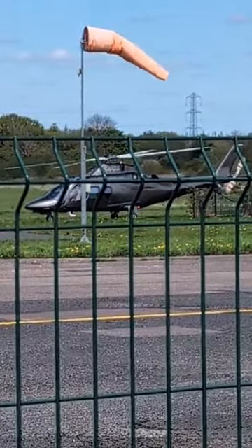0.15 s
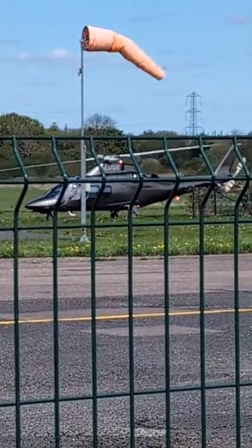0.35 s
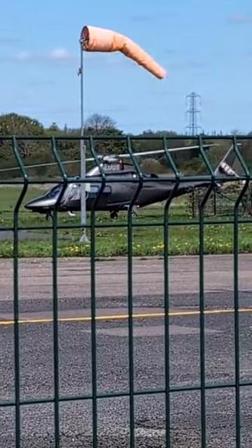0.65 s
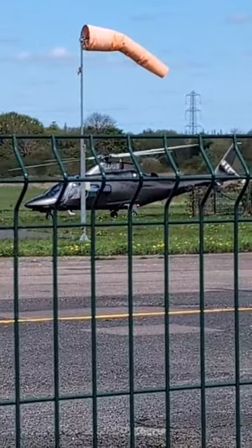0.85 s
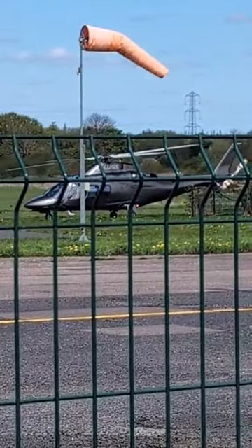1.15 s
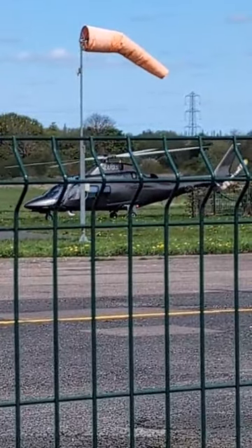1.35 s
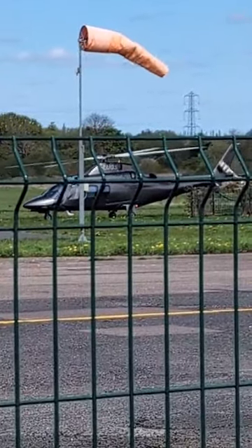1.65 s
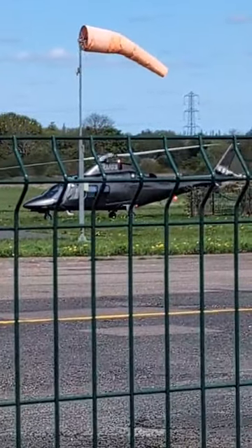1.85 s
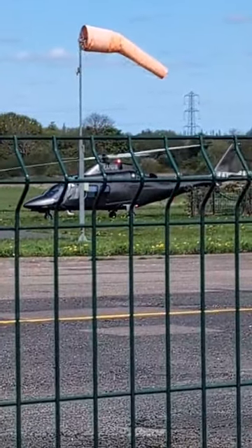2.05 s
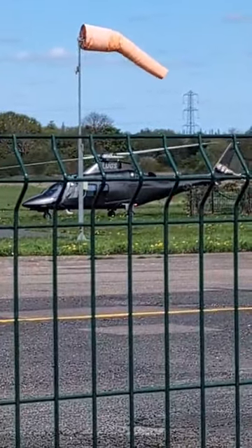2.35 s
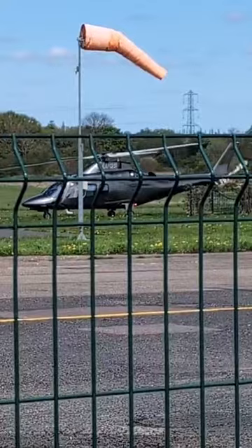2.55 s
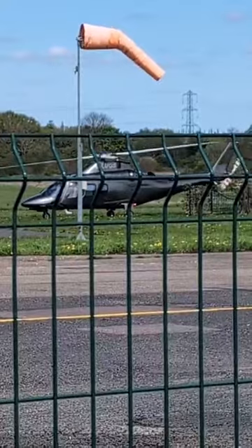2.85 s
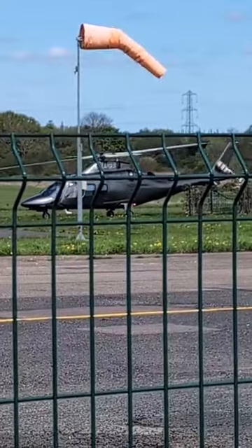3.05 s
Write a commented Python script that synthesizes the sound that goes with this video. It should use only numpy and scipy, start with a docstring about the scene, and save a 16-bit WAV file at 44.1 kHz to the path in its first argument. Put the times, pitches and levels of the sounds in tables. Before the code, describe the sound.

A parked helicopter's low blade throb and hissing exhaust roar, under heavy wind rumble that soon eases

```python
"""Windy grass, some tens of metres from an idling helicopter, heard on a phone with two microphone ports.
Blade thumps are wavering harmonics; the exhaust roar is banded noise that comes and goes in the moving air.
Narrow noise bands are the turbine hisses, sines are the gear tones and a turbine whine running down.
Gusts rumble as low noise and buffet the ports separately as short swings of pressure with raspy noise;
a burst of rough air noise crackles over a gust."""
import sys
import numpy as np
from scipy import signal
from scipy.fft import rfft, irfft
from scipy.io import wavfile
from scipy.ndimage import uniform_filter1d

SR = 44100
rng = np.random.default_rng(int(sys.argv[2]) if len(sys.argv) > 2 else 0)


def wrap_up_sound(samples):
    """Save the sound to the file named by the first command line argument, as 16-bit audio."""
    columns = np.atleast_2d(samples).T
    # keep every value between -1 and 1, then stretch to whole-number steps
    tamed = np.clip(columns, -1, 1)
    steps = np.round(tamed * 32767).astype(np.int16)
    wavfile.write(sys.argv[1], SR, steps)


N = 141120
T = np.arange(N) / SR
HZ = np.fft.rfftfreq(N, 1 / SR)
PORT_SIGN = np.array([[1], [-1]])  # a side signal is opposite on the left and right ports


def undb(db):
    """Decibels to an amplitude factor."""
    return 10 ** (np.asarray(db) / 20)


def unit(x):
    """Scale to an rms of 1."""
    return x / np.sqrt(np.mean(x ** 2))


def curve(table, order):
    """One column of a table over time."""
    return np.interp(T, np.array(table)[:, 0], np.array(table)[:, order])


def over_hz(table, hz):
    """A table read on a log-frequency axis."""
    return np.interp(np.log(hz + 1), np.log(np.array(table)[:, 0]), np.array(table)[:, 1])


def walk(rate):
    """Random levels held for 1 / rate s and smoothed twice, with a spread of about 1."""
    hold = int(SR / rate)
    steps = np.repeat(rng.standard_normal(N // hold + 1), hold)
    smooth = uniform_filter1d(uniform_filter1d(steps, hold), hold)
    return 1.37 * smooth[:N]


def shaped(gain):
    """Noise with a given gain per frequency."""
    return irfft(rfft(rng.standard_normal(N)) * gain, N)


def hump(lo_hz, hi_hz, rise, fall):
    """Band shape with a slope of its own on each flank."""
    low_flank = 1 + (lo_hz / (HZ + 1)) ** (2 * rise)
    high_flank = 1 + (HZ / hi_hz) ** (2 * fall)
    return 1 / np.sqrt(low_flank * high_flank)


def wide_noise(shape, side_gain):
    """Noise shared by both ports plus separate noise of opposite sign on each."""
    return unit(shaped(shape)) + side_gain * unit(shaped(shape)) * PORT_SIGN


WIND_LIKE = 0.25  # share of the rumble's power common to both ports
WIND_TRIM_DB, WIND_FLICKER_DB, PORT_FLICKER_DB = -4.0, 1.5, 1.4
WIND_CALM_DB, WIND_CALM_SPAN_DB = -35.5, 4.2  # silent at the calm level, in full one span above it
# wind rumble on the ports: time_s, level_db (before the trim), lowest_part_db (added for the lower band)
WIND_RUMBLE = [(0.0, -23, 7), (0.11, -10, -4), (0.15, -11, -11), (0.2, -20.5, -2.5), (0.43, -20, 2.5),
               (0.49, -14, 0), (0.55, -22.5, -0.5), (0.64, -34, 7.5), (0.7, -17, 1), (0.75, -23, 8.5),
               (0.8, -25.5, -1.5), (0.87, -13.5, -4), (0.92, -27.5, 2.5), (1.0, -24, 11),
               (1.03, -29.5, -16), (1.12, -9.5, -7), (1.16, -30.5, 12), (1.18, -20, 0.5),
               (1.33, -15.5, -2.5), (1.45, -19.5, -3), (1.57, -16.5, -16), (1.67, -35.5, 3.5),
               (1.94, -31, -4), (2.02, -40.5, 5), (2.18, -34, 3), (2.66, -37.5, -1), (2.69, -26.5, 0),
               (2.72, -30.5, 3), (3.02, -36.5, 10), (3.17, -19, 5.5), (3.2, -15, -5)]


def wind():
    """Moving air on the ports: rumble in two bands, nearly unrelated left and right, churning quickly."""
    out, main, churn = 0, curve(WIND_RUMBLE, order=1), walk(34.56)
    bands = [(hump(107.5, 285, 9.5, 5.2), main),
             (hump(63, 123, 4.0, 3.98), main + curve(WIND_RUMBLE, order=2))]
    calm_gate = np.clip((main - WIND_CALM_DB) / WIND_CALM_SPAN_DB, 0, 1)
    for shape, level_db in bands:
        both = np.sqrt(WIND_LIKE) * unit(shaped(shape))
        ports = np.array([both + np.sqrt(1 - WIND_LIKE) * unit(shaped(shape)) for _ in range(2)])
        port_churn = np.array([walk(39.25), walk(40.26)])
        flicker_db = WIND_FLICKER_DB * churn + PORT_FLICKER_DB * port_churn
        out = out + ports * calm_gate * undb(level_db + WIND_TRIM_DB + flicker_db)
    return out


BLADE_HZ, BLADE_AT_S = 22.56, 2.213  # thump rate and a moment when its phase is zero
BLADE_DB, BLADE_SCATTER_DB = -32.5, 1  # rms of all harmonics together; waver of each one


def blade_phase():
    """Phase of the blade beat in radians, turning at a steady rate."""
    return 2 * np.pi * BLADE_HZ * (T - BLADE_AT_S)


# blade thump harmonics: multiple (of BLADE_HZ), level_db (against each other)
BLADE_HARMONICS = [(2, -33), (3, 1.5), (4, -1), (5, -12.5), (6, -6.5), (7, -8), (8, -4.5), (9, -7),
                   (10, -8), (11, -12.5), (12, -14), (13, -12.5), (14, -16)]


def blades():
    """A low thump per blade; every harmonic wavers on its own, a little differently at each port."""
    out = 0
    for multiple, db in BLADE_HARMONICS:
        amplitude = undb(db + BLADE_SCATTER_DB * walk(7.8))
        waver_rad = 1.2 * walk(9) + 0.51 * np.array([walk(9), walk(9)])
        out = out + amplitude * np.cos(multiple * blade_phase() + waver_rad)
    return undb(BLADE_DB) * unit(out)


# parts of the roar swell or dip for a moment: time_s, half_length_s, pitch_hz, half_width_octaves, level_db
ROAR_SWELLS = [(0.016, 0.034, 3270, 0.18, 7), (0.28, 0.083, 4500, 0.4, 2.5), (0.393, 0.026, 9070, 0.17, 5),
               (0.57, 0.09, 3300, 0.49, 5), (0.598, 0.19, 1570, 0.35, -3), (0.924, 0.14, 3470, 0.14, 7.5),
               (0.894, 0.028, 9400, 0.091, 5.5), (1.097, 0.28, 5110, 0.1, 7.5),
               (1.523, 0.11, 3240, 0.32, 4), (1.657, 0.17, 1385, 0.2, 8), (1.964, 0.055, 1930, 0.15, 10),
               (2.112, 0.067, 1930, 0.17, 7.5), (2.12, 0.12, 2850, 0.087, -11.5),
               (2.08, 0.078, 1480, .12, -6), (2.19, 0.028, 4940, 0.068, 8.5), (2.38, 0.15, 1480, 0.42, 4),
               (2.602, 0.18, 3950, 0.17, -1.5), (2.87, 0.065, 1420, 0.19, 4.5),
               (3.004, 0.056, 8000, 0.48, 3.5), (3.122, 0.044, 3800, 0.16, 6.5),
               (3.168, 0.13, 1500, 0.55, 7)]


def swell_db(hz):
    """Level change over time at one frequency, from bumps in time and log frequency."""
    s, half_s, at_hz, half_oct, db = np.array(ROAR_SWELLS).T
    near_db = db * np.exp(-(np.log2(hz / at_hz) / half_oct) ** 2 / 2)
    coarse_s = T[::256]
    bumps = np.exp(-((coarse_s - s[:, None]) / half_s[:, None]) ** 2 / 2)
    return np.interp(T, coarse_s, near_db @ bumps)


ROAR_DB, ROAR_THROB_DB = -36.5, 0.3
ROAR_FLICKER_DB, FLICKER_DB_PER_OCT = 1.5, 0.62  # flicker, and its growth above 1500 Hz
# exhaust and rotor roar: pitch_hz, level_db (per Hz, against each other)
ROAR_COLOUR = [(24, -38), (40, -15), (51, -11.5), (79, -1.5), (113, -25.5), (134, -19), (228, -15.5),
               (319, -12), (378, -18), (406, -18), (437, -24), (628, -20.5), (970, -25.5), (1430, -22.5),
               (1860, -27.5), (2740, -29.5), (4660, -32), (7930, -42), (12800, -69), (16700, -100)]
# width of the roar: pitch_hz, side_minus_mid_db
ROAR_WIDTH = [(60, -5), (200, -14), (350, -19.5), (640, -12), (1160, -14), (2100, -10), (3790, -8.5),
              (6860, -6.5), (12400, 4.5)]
# the roar as the air carries it, also used by the hisses: time_s, level_db (less of it below 900 Hz here)
AIR_CARRY = [(0, 1), (.4, 0), (.8, 0), (1.2, 2), (1.6, 0.5), (2.0, 0), (2.4, -0.2), (2.8, 0), (2.95, 1.5),
             (3.2, 2)]


def roar():
    """Exhaust noise in bands a fifth of an octave apart that swell, flicker and throb with the blades."""
    out, colour, throb = 0, undb(over_hz(ROAR_COLOUR, HZ)), np.cos(blade_phase())
    place = np.log2(HZ + 1) * 5
    for band in range(27, 70):
        hz = 2 ** (band / 5)
        shape = colour * np.cos(np.pi / 2 * np.clip(place - band, -1, 1))
        carry_db = curve(AIR_CARRY, order=1) * min(hz / 900, 1)
        depth_db = ROAR_FLICKER_DB + FLICKER_DB_PER_OCT * max(np.log2(hz / 1500), 0)
        flicker_db = depth_db * walk(rng.uniform(10.5, 29.86))
        level_db = swell_db(hz) + carry_db + ROAR_THROB_DB * throb + flicker_db
        side = undb(over_hz(ROAR_WIDTH, hz)) * shaped(shape)
        out = out + undb(level_db) * (shaped(shape) + side * PORT_SIGN)
    return undb(ROAR_DB) * unit(out)


HISS_SAG_S, HISS_FLICKER_DB = 1.5, 1.5
HISS_SWELL_TIMES = 2.1  # the hisses follow the roar's swells this many times as deeply, in dB
# narrow hisses of the turbine: pitch_hz, width_hz, level_db, sag_db_per_s (from HISS_SAG_S on)
TURBINE_HISSES = [(3400, 320, -60, 4.5), (4340, 170, -61, 10), (8200, 1400, -60.5, 1.5),
                  (9290, 170, -65, 4.5), (10030, 2000, -68.5, 1.7)]


def hisses():
    """Turbine noise in narrow bands that swell more deeply than the roar around them."""
    out = 0
    for hz, width_hz, db, sag_db in TURBINE_HISSES:
        shape = np.exp(-((HZ - hz) / width_hz) ** 2 * 2)
        steady_db = db - sag_db * np.clip(T - HISS_SAG_S, 0, 9) + curve(AIR_CARRY, order=1)
        moving_db = HISS_SWELL_TIMES * swell_db(hz) + HISS_FLICKER_DB * walk(11.4)
        out = out + undb(steady_db + moving_db) * wide_noise(shape, 0.5)
    return out


TONE_WAVER_DB, TONE_WANDER = 1.5, 0.002  # level waver, and pitch wander as a fraction
GEARS_SLOW_S, GEARS_SLOW_PER_S2 = 1.75, 0.055  # the gears slow ever faster once the turbine is shut down
# gearbox tones: pitch_hz (before slowing), level_db (against their common level)
GEAR_TONES = [(1081.5, 0), (2794, -15)]
# common level of the gear tones: time_s, level_db (rms)
GEAR_LEVEL = [(0, -51), (.27, -48), (.42, -55), (.75, -53.5), (.9, -56.5), (1.18, -55), (1.3, -50),
              (1.42, -55), (1.55, -49), (1.8, -59), (2.3, -57), (3.2, -66)]


def gear_tones():
    """Gear meshing as sines that waver in level and pitch, and sag as the gears slow."""
    out = 0
    for hz, db in GEAR_TONES:
        slowing = GEARS_SLOW_PER_S2 * np.clip(T - GEARS_SLOW_S, 0, 9) ** 2
        pitch_hz = hz * (1 - slowing + TONE_WANDER * walk(12.78))
        level_db = db + curve(GEAR_LEVEL, order=1) + TONE_WAVER_DB * walk(7.92)
        out = out + undb(level_db) * np.sin(2 * np.pi * np.cumsum(pitch_hz) / SR)
    return np.sqrt(2) * out  # sine peak from rms


BUFFET_CYCLES, BUFFET_SCATTER_RAD = 0.61, 1  # envelope half width; phase scatter of each port
BUFFET_EDGE_DB = -11.5  # second harmonic against the swing
RASP_S, RASP_SIDE_DB = 0.0047, -8.5  # half length; side against mid
# single buffets, centred 4 ms after time_s:
# time_s, swing_db, pitch_hz, left_minus_right_db, rasp_db, bright_rasp_db
WIND_BUFFETS = [(0.092, -10.5, 152, 9, -37, -43), (0.11, -7.5, 180, -11, -29, -42),
                (0.122, -9.5, 176, 6, -28, -30), (0.137, -4, 181, 3, -22, -31),
                (0.144, -17, 196, 5, -22.5, -34), (0.182, -20, 183, 13, -29.5, -36),
                (0.266, -12.5, 118, 1, -48, -53), (0.389, -10.5, 133, 0.5, -33, -62),
                (0.468, -13, 201, 9, -49, -45), (0.493, -6, 140, 3.5, -40, -41),
                (0.691, -15.5, 151, 1, -41, -60), (0.867, -17, 188, -7, -44, -55),
                (0.885, -3, 185, 0.5, -35, -51), (0.972, -13.5, 210, 0, -37, -57),
                (0.998, -22, 114, 4, -55, -45), (1.073, -16.5, 138, -5, -29.5, -49),
                (1.114, -7.5, 156, -1, -46, -22), (1.129, -6, 175, 3, -18.5, -39),
                (1.183, -7, 114, -1, -40, -45), (1.217, -15, 107, -11, -52, -45),
                (1.253, -8.5, 157, -3, -37, -58), (1.302, -8, 220, 2, -23, -39),
                (1.341, -2, 178.6, -1.5, -23, -40), (1.391, -17, 154, -2, -52, -53),
                (1.455, -17.5, 143, 7, -47, -37.5), (1.504, -10.5, 130, 0, -44, -43),
                (1.574, -15, 191, -4, -35, -59), (1.589, -20, 140, 4, -46, -51),
                (1.718, -18.5, 107, -1, -58, -50), (1.877, -19.5, 141, 3, -49, -62),
                (2.208, -18.5, 81, 3, -47, -51), (2.699, -19, 162, -1, -39, -45),
                (3.085, -18, 199, 1, -31.5, -44), (3.136, -16.5, 227, 2, -44, -45),
                (3.171, -11, 192, 4, -49, -48)]
# the rasp and the bright rasp: low_hz, high_hz
RASP_EDGES = [(280, 470), (480, 680)]


def buffets():
    """Each buffet is a swing or two of pressure, out of step between the ports, with a short rasp on top."""
    out, gate = np.zeros((2, N)), np.zeros((2, N))
    chance = rng.standard_normal((len(WIND_BUFFETS), 3))
    for (s, db, hz, pan_db, *rasp_db), luck in zip(WIND_BUFFETS, chance):
        i = np.arange(max(int((s - .04) * SR), 0), min(int((s + .05) * SR), N))
        since_s = T[i] - s - .004
        cycles = since_s * hz
        gate[:, i] += undb(rasp_db)[:, None] * np.exp(-(since_s / RASP_S) ** 2 / 2)
        envelope = np.exp(-(cycles / BUFFET_CYCLES) ** 2 / 2)
        for port, sign in enumerate((1, -1)):
            phase = 2 * np.pi * cycles + np.pi * luck[0] + BUFFET_SCATTER_RAD * luck[1 + port]
            swing = np.cos(phase) + undb(BUFFET_EDGE_DB) * np.cos(2 * phase)
            out[port, i] += undb(db + sign * pan_db / 2) * envelope * swing
    for rasp_gate, (lo_hz, hi_hz) in zip(gate, RASP_EDGES):
        out = out + rasp_gate * wide_noise(hump(lo_hz, hi_hz, 4, 6), undb(RASP_SIDE_DB))
    return out


CRACKLE_S, CRACKLE_HALF_S, CRACKLE_DB = 0.1325, 0.014, -34
CRACKLE_LO_HZ, CRACKLE_HI_HZ = 745, 1400


def crackle():
    """A rough burst of air noise over the first gust, its level roughened by a fast random flicker."""
    envelope = np.exp(-((T - CRACKLE_S) / CRACKLE_HALF_S) ** 2 / 2)
    puff = envelope * undb(CRACKLE_DB + 3 * walk(149))
    return puff * wide_noise(hump(CRACKLE_LO_HZ, CRACKLE_HI_HZ, 4.7, 6.9), undb(RASP_SIDE_DB))


# the whine runs down from WHINE_HZ at WHINE_S toward WHINE_END_HZ
WHINE_S, WHINE_HZ, WHINE_END_HZ, WHINE_FALL_S = 2.0, 15430, 8000, 1.883
WHINE_WAVER_DB = 3.5
# level of the whine: time_s, level_db (rms)
WHINE_LEVEL = [(1.9, -110), (2.0, -96), (2.24, -89), (2.5, -84), (2.82, -76), (2.9, -93), (2.96, -65),
               (3.02, -76), (3.1, -60.5), (3.2, -69)]


def whine():
    """The turbine running down: a sine whose pitch decays exponentially, wavering apart on the two ports."""
    fall = np.exp(-np.clip(T - WHINE_S, -.2, 9) / WHINE_FALL_S)
    pitch_hz = WHINE_END_HZ + (WHINE_HZ - WHINE_END_HZ) * fall
    waver = walk(25.5) + 0.38 * np.array([walk(14), walk(9.1)])
    amplitude = np.sqrt(2) * undb(curve(WHINE_LEVEL, order=1) + WHINE_WAVER_DB * waver)
    return amplitude * np.sin(2 * np.pi * np.cumsum(pitch_hz) / SR)


def scene():
    """Everything that reaches the two ports."""
    helicopter = blades() + roar() + hisses() + gear_tones() + whine()
    return wind() + helicopter + buffets() + crackle()


TOP_HZ = 15000


def record(dry):
    """The phone cuts the deep bass, rounds the loudest peaks and cuts the top."""
    bass_cut = signal.butter(3, 45, "high", fs=SR, output="sos")
    top_cut = signal.ellip(8, .2, 70, TOP_HZ, fs=SR, output="sos")
    x = signal.sosfilt(bass_cut, dry)
    rounded = np.tanh(.8 * x) / .8
    return signal.sosfilt(top_cut, rounded)


dry = scene()
out = record(dry)
wrap_up_sound(out)
```